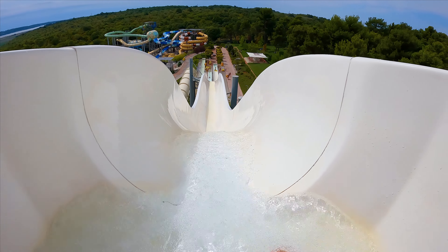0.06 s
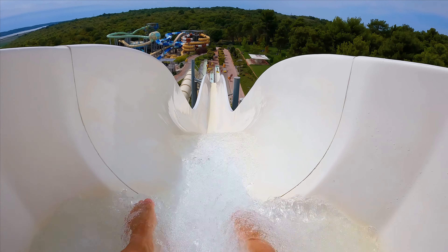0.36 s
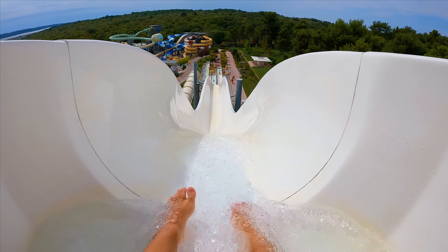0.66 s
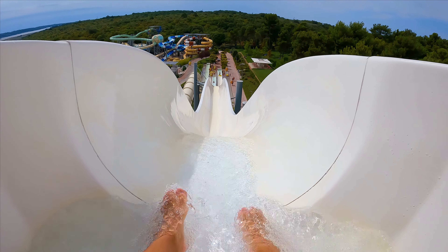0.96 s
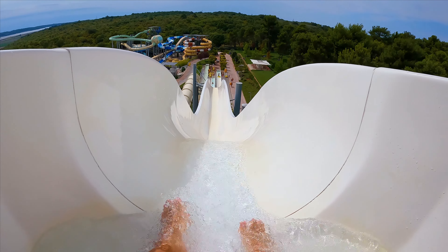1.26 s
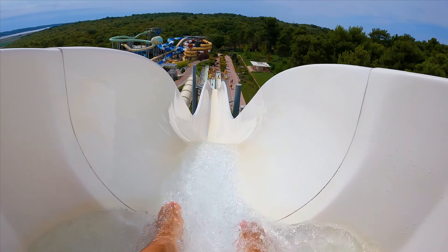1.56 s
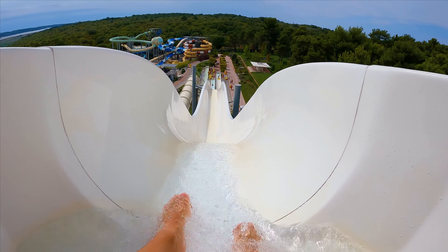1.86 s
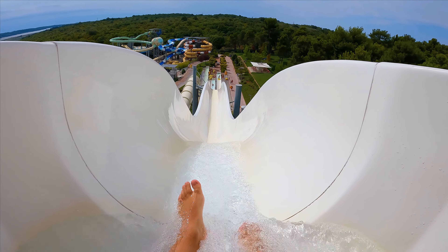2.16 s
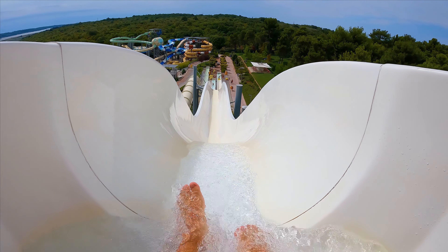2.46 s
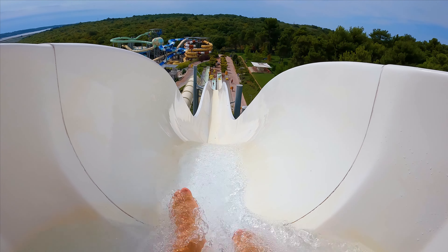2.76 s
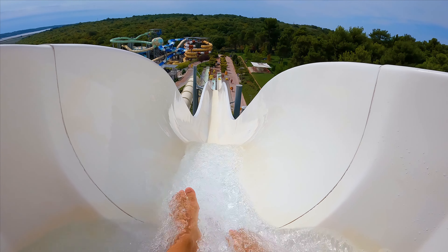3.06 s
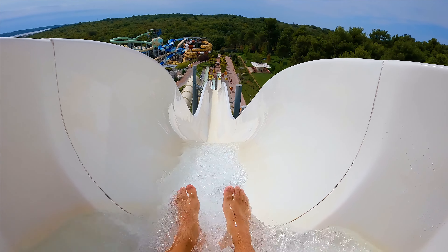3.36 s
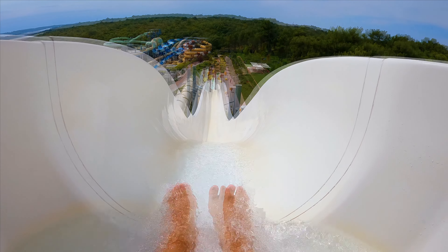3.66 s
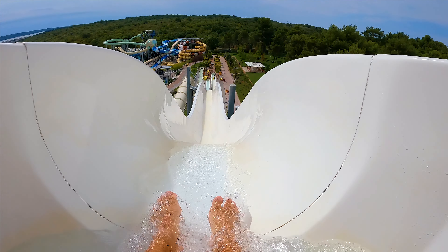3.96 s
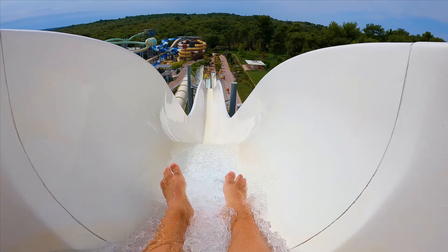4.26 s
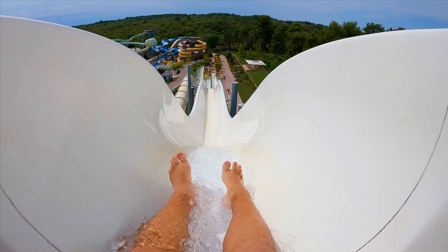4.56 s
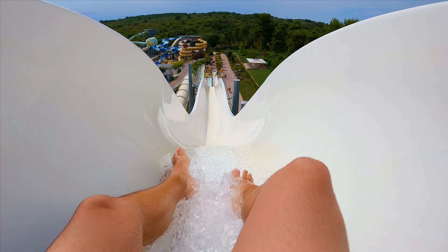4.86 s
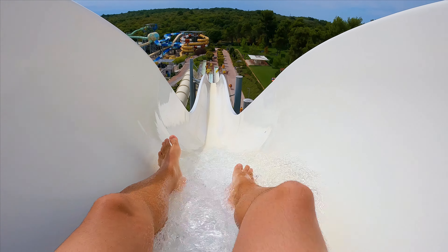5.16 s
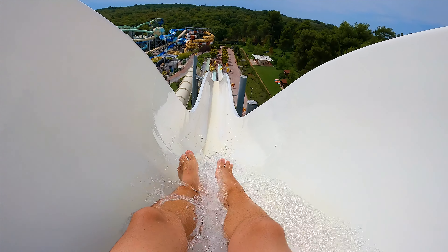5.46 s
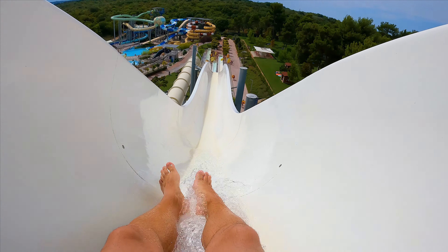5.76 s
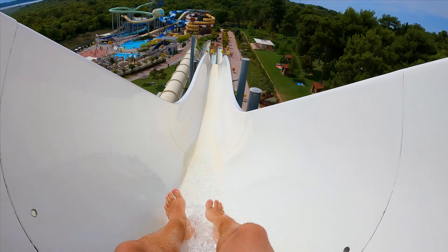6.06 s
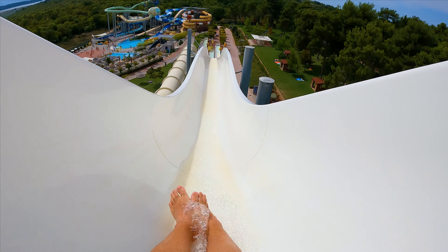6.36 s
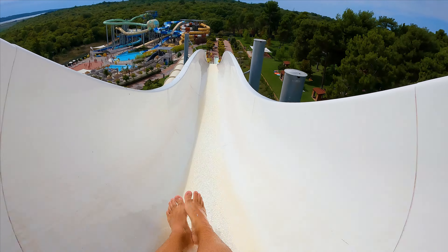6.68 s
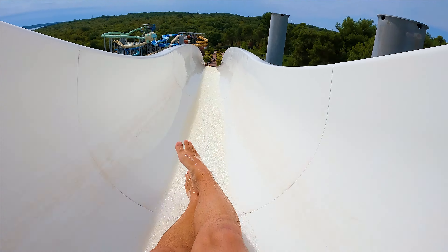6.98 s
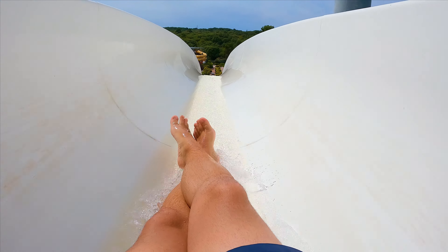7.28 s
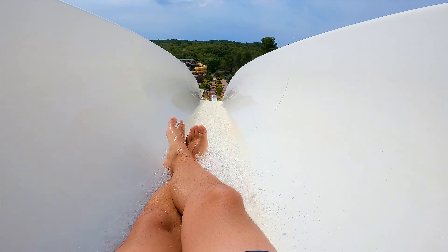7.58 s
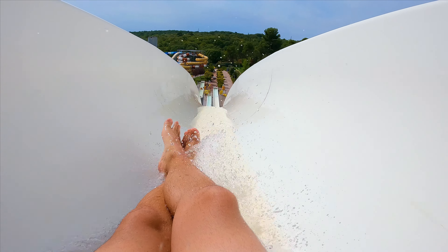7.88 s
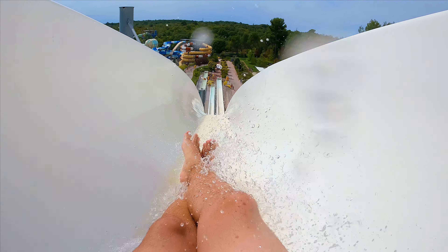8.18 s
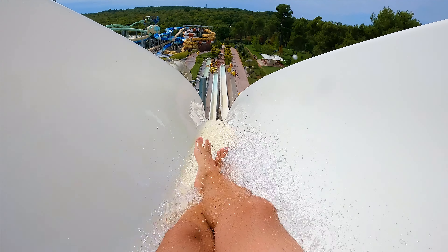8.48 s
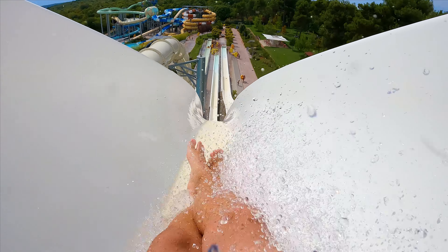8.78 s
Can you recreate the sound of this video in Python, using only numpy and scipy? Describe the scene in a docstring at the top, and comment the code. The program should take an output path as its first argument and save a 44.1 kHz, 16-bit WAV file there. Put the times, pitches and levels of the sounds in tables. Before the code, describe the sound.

Heard close from a microphone carried by a rider on an outdoor waterslide, churning water pours steadily, with gurgles, light foot splashes and a low wind rumble. A short low groan marks the push-off, and the pouring falls away. The descent brings growing wind buffeting and a hollow wash of water, with irregular booming slaps and muffled heel and elbow knocks, then a burst of spray and scattered drops.

```python
"""An open waterslide, heard from a camera on the rider. Water gushes, fizzes and glugs into the
start tub, ringing between the chute's walls. Feet splash, the shell groans at the push-off, and
the tub falls away behind the brow. The body skims the water film and slaps through it, heels and
elbows clack on the shell, and spray strikes the camera. Underneath, wind buffets the microphone,
harder as the ride picks up speed."""
import sys
import numpy as np
from scipy import signal
from scipy.fft import rfft, irfft, next_fast_len
from scipy.io import wavfile
from scipy.ndimage import uniform_filter1d, minimum_filter1d, map_coordinates

SR = 44100
rng = np.random.default_rng(int(sys.argv[2]) if len(sys.argv) > 2 else 0)


def put_to_file(sound):
    """Save the sound as 16-bit audio at rate SR, in the file named by the first command-line argument."""
    columns = np.atleast_2d(sound).T  # one column per channel
    safe = np.clip(columns, -1, 1)
    whole_steps = np.round(safe * 32767)
    wavfile.write(sys.argv[1], SR, whole_steps.astype(np.int16))


N = 398223

# The echo between the walls. Each row: time in seconds, resonance spacing in Hz, share that returns.
WALL_ECHO = [(0, 306, .24), (2, 316, .3), (2.8, 317, .48), (4, 318, .35), (4.4, 328, .35), (4.65, 336, .42),
             (4.9, 358, .35), (5.15, 386, .12), (5.4, 410, .08), (5.62, 560, .13), (5.85, 640, .18),
             (6.5, 700, .2)]
# The largest air pockets. Each row: start in seconds, peak level in dB, starting pitch in Hz,
# rise as a share of that pitch per second.
BIG_GLUGS = [(1.159, -18, 335, 2), (1.87, -15.5, 322.5, 1.9), (2.235, -19.5, 366.4, 2), (2.41, -20, 629, 1),
             (2.52, -19, 530, 1.5), (3.03, -20, 609, 0.84), (3.26, -17.5, 593, 2.6), (3.257, -22, 366, 2.2),
             (3.985, -21, 818, 2.8), (4.405, -17, 415, 11)]
# The rider's pace. Each row: time in seconds, share of full speed.
RIDER_SPEED = [(4.1, 0.027), (6, 0.22), (7.2, 0.4), (8, 0.76), (9.03, .85)]
# The wash surges in deep water and drops in shallow.
# Each row: centre in seconds, boost or cut in dB, half length in seconds.
WASH_SURGES = [(6.062, 7, .28), (7.37, -2.5, .09), (8.224, 4.5, .16), (8.932, 3, .16)]
# The body slaps through the water.
# Each row: peak time in seconds, boom level in dB, smack level in dB, half length in seconds.
BODY_SLAPS = [(4.842,-22,-45,.012), (6.008,-18,-37,.011), (6.056,-16,-42,.013), (6.119,-16.5,-50,.023),
              (6.218,-20.5,-30.5,.019), (6.258,-17,-42,.023), (6.342,-18.5,-42,.012),
              (6.689,-17.5,-33.5,.015), (6.713,-20.5,-44,.008), (6.749,-25.5,-45,.008),
              (6.985,-18.5,-42.5,.012), (7.009,-18,-36,.006), (7.084,-25.5,-47,.014), (7.147,-17.5,-40,.02),
              (7.178,-18.5,-38,.009), (7.217,-21,-47,0.0064), (7.295,-17,-36,.016), (7.429,-24.5,-48,.011),
              (7.487,-23.5,-48,.011), (7.544,-21,-41,.015), (7.612,-19,-35,.012), (7.656,-25,-49,.013),
              (7.74,-20.5,-35.5,.012), (7.778,-19.5,-40,.016), (7.864,-23,-44,.012), (7.919,-22,-42,.009),
              (8.01,-19.5,-44,.014), (8.071,-18,-35,.028), (8.108,-15.5,-27,0.0073), (8.177,-19.5,-34,.024),
              (8.235,-19.5,-30.5,.032), (8.31,-17.5,-30.5,.036), (8.39,-18.5,-32,.011),
              (8.439,-20.5,-30,.012), (8.496,-22,-43,.013), (8.526,-23.5,-44,.01), (8.555,-20.5,-42,.009),
              (8.632,-26.5,-37,.008), (8.709,-19.5,-35.5,.021), (8.758,-17.5,-33,.023),
              (8.84,-18.5,-31.5,.02), (8.893,-16.5,-32.5,.014), (8.939,-19,-35.5,.022),
              (8.975,-15,-30,.009), (9.008,-16,-30.5,.022)]
# Heels and elbows on the shell. Each row: start in seconds, level before muffling in dB, pitch in Hz.
SHELL_CLACKS = [(6.3367, -12.5, 600), (6.6896, -22, 990), (7.0745, -21, 697), (7.153, -25, 1230),
                (7.1744, -24, 1080), (7.2165, -19, 650), (7.2945, -14, 790), (8.0545, -21, 1140),
                (8.104, -16, 1060), (8.1065, -13, 1000), (8.1562, -14, 965), (8.2329, -17, 1150),
                (8.2668, -25, 1380), (8.3931, -18, 1040), (8.442, -26, 1220), (8.6324, -20.5, 1110),
                (8.886, -19, 1180), (9.0012, -23, 1180)]
# The hollow between legs and shell. Each row: time in seconds, resonance in Hz, level in dB.
LEG_HOLLOW = [(5.6, 770, -34), (5.9, 740, -33), (6.1, 680, -29.5), (6.4, 710, -31.5), (6.65, 720, -31.5),
              (6.9, 659.7, -39.5), (7.35, 620, -40.5), (7.5, 620, -34.5), (7.6, 760, -28),
              (7.7, 639.3, -32), (7.95, 699.5, -36), (8.15, 720, -32.5), (8.55, 660, -33), (9.03, 700, -28)]
# The feet hit the water. Each row: peak time in seconds, splash level in dB, spray level in dB,
# length in seconds (the splash's decay time and the spray's half length).
FOOT_SPLASHES = [(1.082, -26.5, -47, 0.017), (1.932, -39, -61, 0.0094), (2.447, -31, -53, 0.01),
                 (3.246, -32, -61, 0.0092), (3.434, -32, -57, .01), (4.353, -26, -44.5, 0.009),
                 (4.512, -44, -62, 0.011), (5.372, -41.5, -51.5, 0.028), (5.547, -37.5, -65, .02),
                 (6.036, -39.5, -53.5, 0.015), (6.228, -46, -56, 0.011), (6.442, -50, -58.5, 0.032),
                 (6.681, -44, -64, 0.0072), (8.002, -62, -63.5, 0.044), (8.53, -63, -63, 0.054),
                 (8.63, -53, -62, 0.025)]
# Drops on the camera; the last row is a short click at the very end.
# Each row: start in seconds, level in dB.
DROPS_AND_CLICK = [(7.996, -43), (8.302, -34.5), (8.3085, -30), (8.359, -35), (8.378, -37), (8.393, -38.5),
                   (8.4175, -40), (8.453, -44), (8.506, -42), (8.5445, -44), (8.552, -43), (8.595, -46),
                   (8.6425, -39), (8.6705, -44.5), (8.888, -47.5), (8.917, -42.5), (8.9575, -45),
                   (8.975, -47), (9.0175, -42)]
# Gusts and lulls. Each row: centre in seconds, boost or cut in dB, half length in seconds.
WIND_GUSTS = [(.1, 3, 0.2), (.6, -2.5, .22), (1.25, 4, 0.3), (1.85, 2, .2), (2.498, 3, 0.26),
              (3.4, 3.5, 0.21), (4.35, 2.5, 0.25), (4.95, 2, 0.17), (5.502, -2, .1), (6.5, -1.5, .12),
              (7.058, -10, 0.012), (7.142, 2.5, 0.052), (7.243, -3, 0.018), (7.35, -4, 0.039),
              (7.8, -1.5, .4), (8.622, -4, 0.048)]

# The EQ curves that give each layer its tone. Each row: frequency in Hz, relative gain in dB.
GUSH_EQ = [(60, -37.5), (150, -2), (210, -3.5), (265, -2.5), (315, -1.5), (365, -2), (412, 2.5),
           (520, -1.5), (620, -3), (690, 0), (790, -1), (870, -0.5), (945, 0), (1010, -2.5), (1090, -5),
           (1500, -20), (2100, -34.5), (4000, -76.5)]  # the inlet, close up
GUSH_BEHIND_EQ = [(60, -38), (200, -9.5), (300, -9), (400, 2.5), (540, 1), (760, 0), (940, -2), (1100, -7),
                  (1500, -19.5), (2100, -33.5), (4000, -76)]  # the inlet, once it is behind the rider
FIZZ_EQ = [(600, -22), (1300, 9.5), (1900, 2), (2900, -7.5), (4000, -20.5), (6000, -33.5), (8200, -46.5),
           (9500, -75)]  # droplets and fine bubbles
WASH_EQ = [(120, -6.5), (250, -9), (350, -4.5), (520, -1.5), (680, -3), (820, -4.5), (1050, -15),
           (1500, -25), (2200, -45.5), (4000, -56.5), (8000, -89.5)]  # the water film under the body
SPRAY_EQ = [(900, -13.5), (2000, 7), (3200, -1), (4300, -11), (6000, -17.5), (8000, -31), (9500, -56.5)]  # fine thrown spray
SHELL_BOOM_EQ = [(40, -25), (110, 1), (200, 10), (330, 6), (500, 4), (720, 1.5), (900, -5.5), (1150, -21.5),
                 (2000, -46.5), (5000, -83.5)]  # the low end of a slap
SMACK_EQ = [(600, -25.5), (1000, 10), (1350, 1), (1900, -14.5), (3000, -37.5), (6000, -59), (10000, -100)]  # water squeezed under the body
GROAN_EQ = [(60, -28.5), (130, -11), (175, 5.5), (215, 0.5), (280, -10), (500, -32.5), (1200, -79.5)]  # the shell's low mode
CASE_EQ = [(500, -18), (1500, 9.5), (3200, -3.5), (4200, -3.5), (4800, -20), (7500, -17.5), (8700, -26),
           (9600, -44), (12000, -49.5), (14000, -61.5)]  # a sheet of water on the camera's case
TICK_EQ = [(800, -12), (2500, 14), (5000, 6.5), (7000, -0.5), (8500, -18), (10000, -30.5), (13000, -33),
           (15000, -60)]  # single drops on the case, and the short click at the very end
RUMBLE_EQ = [(12, -24), (24, 6.5), (45, -0.5), (70, -2), (115, -4), (170, -11.5), (260, -23), (450, -27.5),
             (1000, -55), (3000, -91.5)]  # wind at rest
FLUTTER_EQ = [(15, -29), (40, 3), (110, 0), (160, -4.5), (230, -5.5), (320, -21), (500, -31), (1000, -58),
              (3000, -97)]  # wind at full speed
SIZZLE_EQ = [(10400, -70.5), (11000, -23), (11600, -5.5), (12000, 3.5), (12700, -4.5), (13600, 0),
             (14500, 0.5), (15300, -25), (15700, -28)]  # the very high hiss

EXIT_S, EXIT_TAKES_S = 4.66, 0.45  # the rider slides out of the tub
FILM_S, FILM_TAKES_S = 5.54, 1  # the body starts to plane
BROW_S, BROW_FADE_S, BROW_SHADE_DB = 5.86, .52, 32  # the brow hides the inlet


def inlet():
    """Churning water and bubbles ring between the walls; the ring rises as the chute narrows."""
    spacing_hz, wall_gain = curves(WALL_ECHO)
    froth = bubbles(count=3000, low_hz=294.4, high_hz=3390, cycles=9, rise=.15, spread_db=0)
    close = voiced(churn(patchy_db=.3) + .3 * froth, GUSH_EQ)
    behind = voiced(churn(patchy_db=1), GUSH_BEHIND_EQ)
    gush = crossfade(close, behind, ease(5.1, takes_s=.45))
    reflected = signal.sosfiltfilt(lowpass(4, hz=1110), gush)  # the walls scatter the treble
    echoes = sum(wall_gain ** trips * map_coordinates(reflected, [np.arange(N) - trips * SR / spacing_hz])
                 for trips in (1, 2, 3))
    fizz = voiced(churn(patchy_db=2) + .73 * patter(rate=1100, spread_db=2) + .11 * froth, FIZZ_EQ)
    foot_lifted = bump(2.35, half_s=.5)  # less fizz with one foot out of the flow
    fizz_db = -37.5 - 2 * foot_lifted + .61 * wobble(35)
    wading = bump(EXIT_S, EXIT_TAKES_S)  # the gush swells as the body ploughs through it
    gush_db = -21 + .45 * wading + .35 * wobble(25)
    return unit(gush + echoes) * from_tub(gush_db, loss_db=.8) + fizz * from_tub(fizz_db, loss_db=6.5)


def gurgles():
    """Air pockets glug in the start tub; the largest stand out, wavering and rising in pitch."""
    glugs = bubbles(count=260, low_hz=290, high_hz=480, cycles=22, rise=.08, spread_db=1.5)
    water = glugs * from_tub(-32, loss_db=14)
    t = np.arange(SR // 10) / SR
    swell_s = .013
    swell = t / swell_s * np.exp(1 - t / swell_s)
    for s, db, hz, rise in BIG_GLUGS:
        phase = 2 * np.pi * hz * t * (1 + rise * t / 2) + wobble(110)[:len(t)]
        water[round(s * SR):][:len(t)] += amp(db) * swell * np.sin(phase)
    return water


def skim():
    """The body planes on the water film, louder with speed; the feet throw fine spray in spurts."""
    planing = ease(FILM_S, FILM_TAKES_S)
    wash_db = -35.5 + 4.5 * speed() + swells_db(WASH_SURGES)
    wash = voiced(churn(patchy_db=1), WASH_EQ) * planing * amp(wash_db + 1.9 * wobble(40))
    spray = voiced(churn(patchy_db=1) + 2.1 * patter(rate=440, spread_db=-.5), SPRAY_EQ)
    spurts = sum(amp(db) * bump(s, half_s) for s, _, db, half_s in FOOT_SPLASHES)
    return wash + spray * (planing * amp(-62.5) + spurts) * amp(2.1 * wobble(22))


def slaps():
    """Each slap is a knock and a rattle of blows: the shell booms and the squeezed water smacks."""
    t = np.arange(N) / SR
    boom, smack, contacts = np.zeros((3, N))
    for s, boom_db, smack_db, half_s in BODY_SLAPS:
        span = slice(int(s * SR) - SR // 8, int(s * SR) + SR // 4)
        age = (t[span] - s) / half_s
        swell = np.exp(-np.where(age < 0, .92 * age, .77 * age) ** 2)  # rises faster than it falls
        boom[span] += amp(boom_db) * swell
        smack[span] += amp(smack_db) * swell ** 2
        contacts[round((s - half_s / 2) * SR)] += amp(boom_db - 3)  # the knock leads the boom
    blows = patter(rate=900, spread_db=2) + .35 * rng.standard_normal(N)
    rattle = amp(3 * wobble(220))  # the water breaks in separate pats
    knocks = colour(contacts, SHELL_BOOM_EQ)
    knocks *= 2 * contacts.max() / np.abs(knocks).max()
    return knocks + voiced(blows, SHELL_BOOM_EQ) * boom + voiced(blows * rattle, SMACK_EQ) * smack


def clacks():
    """Heels and elbows hit the shell: a hard edge, muffled by water, that rings for a few cycles."""
    attack_s, decay_cycles = .0006, 1.2
    t = np.arange(SR // 40) / SR
    hits = np.zeros(N + SR)
    for s, db, hz in SHELL_CLACKS:
        envelope = (1 - np.exp(-t / attack_s)) * np.exp(-t * hz / decay_cycles)
        hits[round(s * SR):][:len(t)] += amp(db) * envelope / envelope.max() * np.sin(2 * np.pi * hz * t)
    return signal.sosfilt(lowpass(3, hz=2100), hits[:N])


def hollow():
    """Water rushing between legs and shell rings in one resonance that shifts as the body moves."""
    width_hz, waver_hz = 110, 55
    centre_hz, level_db = curves(LEG_HOLLOW)
    drift = signal.sosfilt(lowpass(2, hz=width_hz / 2), rng.standard_normal((2, N)))
    phase = 2 * np.pi * np.cumsum(centre_hz + waver_hz * wobble(10)) / SR
    ring = unit(drift[0] * np.cos(phase) + drift[1] * np.sin(phase))  # a narrow band of noise
    return ring * ease(FILM_S, FILM_TAKES_S) * amp(level_db)


def feet():
    """The feet make small splats: droplets and fine bubbles with a fast attack and a short tail."""
    envelope = sum(amp(db) * np.where(since(s) > 0, np.exp(-since(s) / decay_s), bump(s, decay_s / 4))
                   for s, db, _, decay_s in FOOT_SPLASHES)
    droplets = patter(rate=900, spread_db=2.5)
    froth = bubbles(count=2800, low_hz=1260, high_hz=3860, cycles=6.3, rise=.092, spread_db=0)
    return voiced(droplets + 1.1 * froth + .6 * rng.standard_normal(N), FIZZ_EQ) * envelope


def push_off():
    """Hands and seat drag on the shell, which groans in one broad low mode."""
    return voiced(churn(patchy_db=1.5), GROAN_EQ) * amp(-23.5) * bump(4.87, half_s=.13)


def camera_spray():
    """A sheet of water hits the case and dulls as it drains; drops spatter; a short click sounds at the very
    end."""
    hit_s, attack_s, sag_s, dull_s, hold_s = 8.305, .012, .015, .06, .086
    sag_db, release_db_per_s = 8, 321
    age = since(hit_s)
    attack = np.where(age > 0, 1, bump(hit_s, attack_s))
    sheet_db = -31 - sag_db * (1 - np.exp(-age / sag_s)) - release_db_per_s * since(hit_s + hold_s)
    bright = voiced(churn(patchy_db=2.5) + 1.1 * patter(rate=1600, spread_db=4.5), CASE_EQ)
    dull = signal.sosfiltfilt(lowpass(2, hz=4800), bright)
    sheet = (dull + (bright - dull) * np.exp(-age / dull_s)) * attack * amp(sheet_db)
    t = np.arange(SR // 25) / SR
    burst = .7 * np.exp(-t / .00083) + .08 * np.exp(-t / .006)  # a sharp tick with a soft tail
    # small drops land at random after the sheet
    drizzle = [(hit_s + when * (N / SR - hit_s), -51.5 - 7 * faint) for when, faint in rng.random((12, 2))]
    hits = np.zeros(N + SR)
    for s, db in list(DROPS_AND_CLICK) + drizzle:
        hits[round(s * SR):][:len(t)] += amp(db) * burst
    return sheet + voiced(rng.standard_normal(N), TICK_EQ) * uniform_filter1d(hits[:N], size=24)


def wind():
    """Eddies press on the microphone, harder and finer with speed; their swings are soft-clipped."""
    rest_db, rise_db, knee_speed = -33.5, 16.5, .15
    pace = speed()
    rumble = voiced(rng.standard_normal(N), RUMBLE_EQ)
    flutter = voiced(rng.standard_normal(N), FLUTTER_EQ)
    deep = unit(signal.sosfilt(lowpass(2, hz=56.3), rumble))
    breeze = crossfade(deep, rumble, ease(.94, takes_s=.46))  # opens up as the legs settle into the flow
    eddies = np.sqrt(1 - pace ** 2) * breeze + pace * flutter
    buffet = signal.sosfilt(lowpass(4, hz=420), np.tanh(.55 * eddies))
    buffet_db = rest_db + rise_db * np.tanh(pace / knee_speed)
    return unit(buffet) * amp(buffet_db + swells_db(WIND_GUSTS) + 1.5 * wobble(26))


def high_hiss():
    """A very high sizzle with fine ticks cuts out as the ride starts, then sputters once more."""
    ticks = patter(rate=45, spread_db=6)
    sizzle = voiced(rng.standard_normal(N) + .35 * ticks, SIZZLE_EQ)
    age = since(5.11)
    release_db = np.maximum(-193 * age, -17.5 - 44 * age)  # a fast drop, then a faint tail
    sputter = amp(-68.5) * bump(5.365, half_s=.063)
    level = from_tub(-47.5 + release_db, loss_db=4.5) + sputter
    return sizzle * level * amp(.9 * wobble(160) + .6 * wobble(14))


def from_tub(db, loss_db):
    """The fader for a sound in the tub: down as the rider slides out, and again behind the brow."""
    hidden = 1 - np.exp(-since(BROW_S) / BROW_FADE_S)
    return amp(db - loss_db * ease(EXIT_S, EXIT_TAKES_S) - BROW_SHADE_DB * hidden)


def speed():
    """The rider's share of full speed."""
    return np.clip(curves(RIDER_SPEED)[0], 0, 1)


def bubbles(count, low_hz, high_hz, cycles, rise, spread_db):
    """Damped sines whose pitch climbs as each bubble nears the surface, rms 1."""
    when, pitch, size, life = rng.random((count, 4)).T[:, :, None]
    t = np.arange(SR // 25) / SR
    hz = low_hz * (high_hz / low_hz) ** pitch
    age = t * hz / (cycles * (.5 + life))
    ring = np.sin(2 * np.pi * hz * t * (1 + rise * np.minimum(age, 2) / 2))
    ring *= np.exp(-np.pi * age) * (1 - t / t[-1])
    ring *= 1 - np.exp(-(2 * t * hz) ** 2)  # a soft attack
    strength = hz * amp(spread_db * np.minimum(-np.log(1 - size), 4))
    index = (when * N).astype(int) + np.arange(len(t))
    return unit(np.bincount(index.ravel(), (ring * strength).ravel(), N)[:N])


def churn(patchy_db):
    """Churning water: white noise with brief louder and softer patches across the spectrum, rms 1."""
    spectrum = signal.stft(rng.standard_normal(N), nperseg=512)[2]
    patches = uniform_filter1d(rng.standard_normal(spectrum.shape), size=5, axis=0)
    patches = uniform_filter1d(patches, size=7, axis=1)
    return unit(signal.istft(spectrum * amp(patchy_db * unit(patches)), nperseg=512)[1][:N])


def patter(rate, spread_db):
    """Droplet impacts of random size, about rate a second, rms 1."""
    hit = rng.random(N) < rate / SR
    size = amp(spread_db * np.clip(rng.standard_normal(N), -2, 2))
    return unit(hit * size * rng.choice([-1, 1], N))


def colour(x, eq):
    """A minimum-phase EQ, so nothing rings ahead of a hit."""
    size = next_fast_len(N + 8192, real=True)
    size += size % 2
    hz, db = np.transpose(eq)
    gain = amp(np.interp(np.log(np.fft.rfftfreq(size, 1 / SR) + 1), np.log(hz), db))
    cepstrum = irfft(np.log(gain))
    cepstrum[1:size // 2] *= 2
    cepstrum[size // 2 + 1:] = 0
    return irfft(rfft(x, size) * np.exp(rfft(cepstrum)))[:N]


def voiced(x, eq):
    """A sound through an EQ curve, brought to rms 1."""
    return unit(colour(x, eq))


def lowpass(order, hz):
    """Filter sections that roll off the top end."""
    return signal.butter(order, hz, fs=SR, output="sos")


def crossfade(a, b, mix):
    """An equal-power blend from a to b."""
    return np.sqrt(1 - mix) * a + np.sqrt(mix) * b


def curves(rows):
    """One automation curve for each column after the time."""
    s, *columns = np.transpose(rows)
    return [np.interp(np.arange(N) / SR, s, column) for column in columns]


def swells_db(rows):
    """A fader ride in dB, made of bell-shaped boosts and cuts."""
    return sum(db * bump(s, half_s) for s, db, half_s in rows)


def wobble(rate):
    """Smooth random modulation, rate points a second, rms 1."""
    points = rng.standard_normal(int(N * rate / SR) + 4)
    return unit(map_coordinates(points, [np.arange(N) * rate / SR]))


def since(s):
    """Seconds since a moment, zero before it."""
    return np.maximum(np.arange(N) / SR - s, 0)


def ease(s, takes_s):
    """A smooth fade from 0 to 1, centred on a moment."""
    return .5 + .5 * np.sin(np.pi * np.clip((np.arange(N) / SR - s) / takes_s, -.5, .5))


def bump(s, half_s):
    """A bell-shaped swell of height 1."""
    return np.exp(-np.minimum(((np.arange(N) / SR - s) / half_s) ** 2, 50))


def amp(db):
    """Decibels to gain."""
    return 10 ** (np.asarray(db) / 20)


def unit(x):
    """Scale to rms 1."""
    return x / np.sqrt(np.mean(x ** 2) + 1e-20)


def scene():
    """The mix: everything sits in the centre except the high hiss, which is hard left."""
    start = inlet() + gurgles() + feet() + push_off()
    ride = wind() + skim() + hollow() + slaps() + clacks() + camera_spray()
    centre = start + ride
    return np.array([centre + high_hiss(), centre])


def record(dry):
    """A limiter holds down the strongest blows, and a brick-wall filter cuts the very top."""
    ceiling, top_hz = .58, 15700
    needed = np.minimum(1, ceiling / (np.abs(dry).max(axis=0) + 1e-9))
    gain = uniform_filter1d(minimum_filter1d(needed, size=700), size=350)
    gain = uniform_filter1d(gain, size=350)
    size = next_fast_len(N + 8192)
    passband = np.fft.rfftfreq(size, 1 / SR) < top_hz
    return irfft(rfft(dry * gain, size) * passband, size)[:, :N]


dry = scene()
out = record(dry)
put_to_file(out)
```